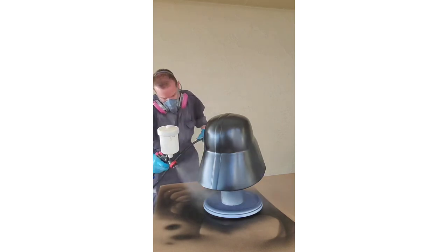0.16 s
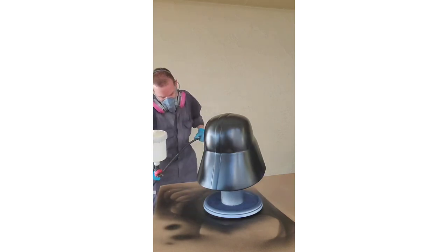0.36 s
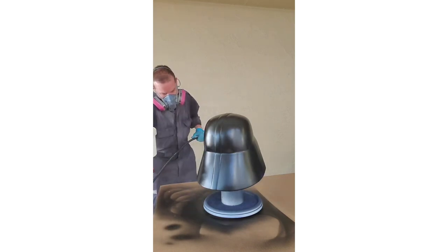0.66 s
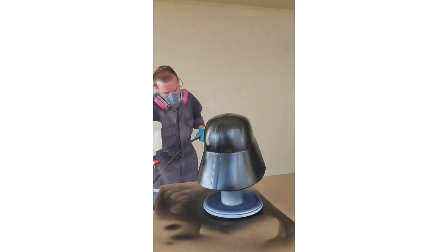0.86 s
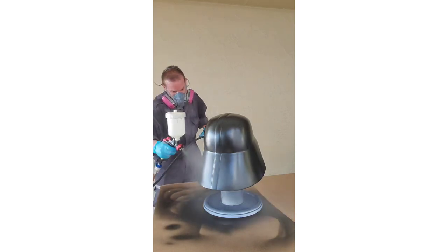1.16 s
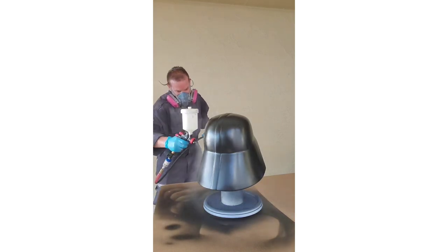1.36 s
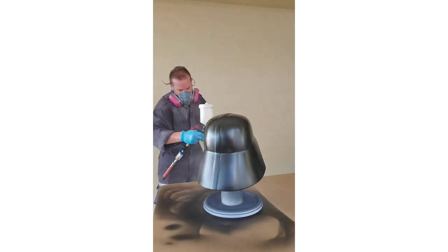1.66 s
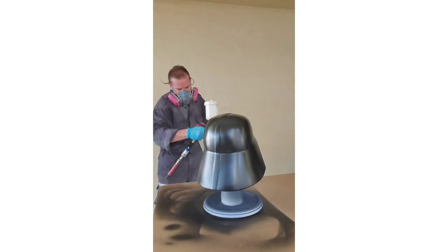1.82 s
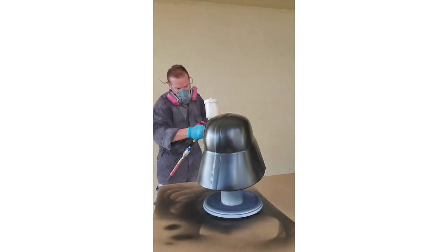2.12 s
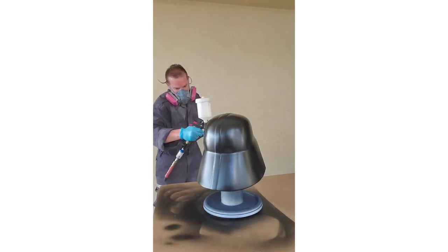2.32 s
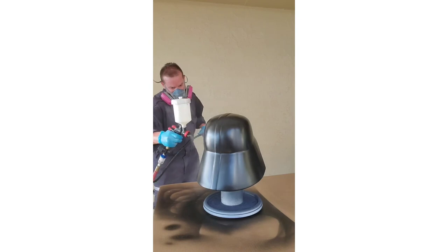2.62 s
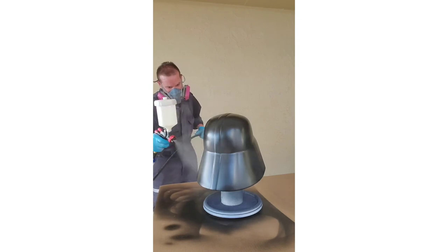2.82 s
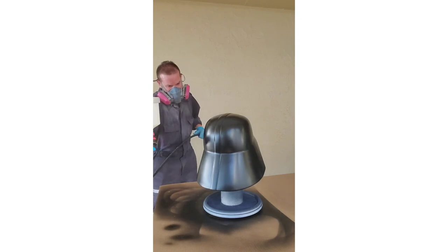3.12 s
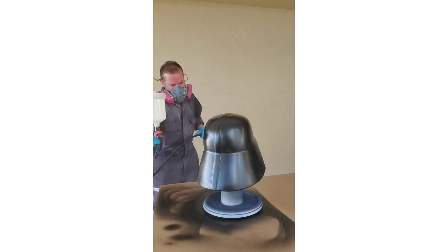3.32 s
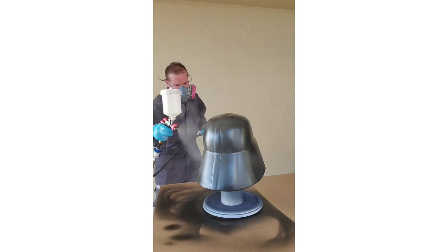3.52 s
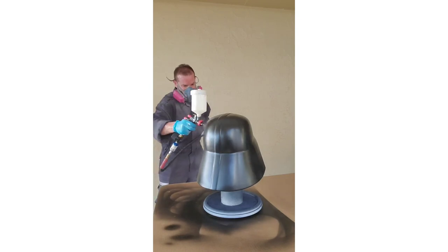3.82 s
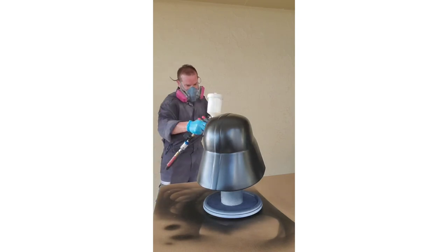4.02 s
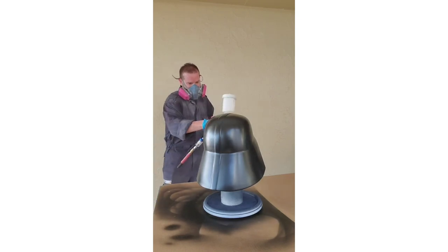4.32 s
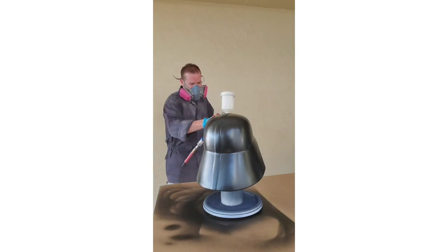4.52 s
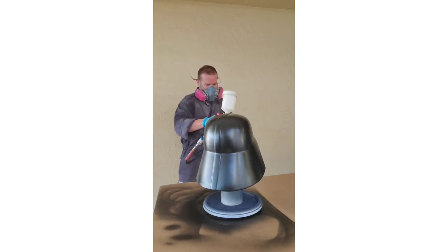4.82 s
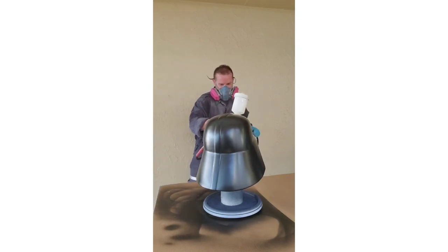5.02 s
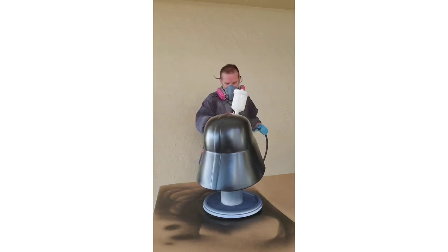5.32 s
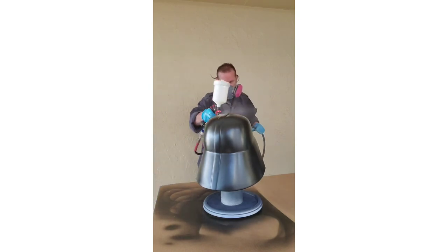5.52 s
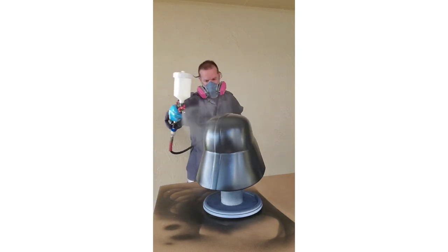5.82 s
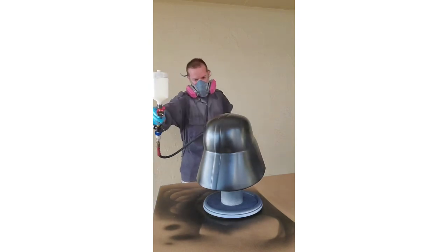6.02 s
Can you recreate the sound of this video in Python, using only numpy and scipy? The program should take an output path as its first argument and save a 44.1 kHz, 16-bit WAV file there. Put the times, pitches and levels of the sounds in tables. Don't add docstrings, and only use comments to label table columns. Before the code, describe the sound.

In a bare workshop, compressed air hisses from a paint gun sweeping nearer and farther, its tone flickering and shifting between left and right. It stops and restarts four times, with dull clicks at release and faint brushing of hose and clothing before the last burst. Steady fan air with a faint wavering tone and fluttery low wind thumps on the phone microphone fill the gaps.

```python
import sys
import numpy as np
from scipy import signal
from scipy.fft import rfft, irfft
from scipy.io import wavfile
from scipy.ndimage import uniform_filter1d

SR = 44100
rng = np.random.default_rng(int(sys.argv[2]) if len(sys.argv) > 2 else 0)


def persist_wave(psi):
    counts = np.round(np.clip(psi, -1, 1) * 32767).astype(np.int16)
    wavfile.write(sys.argv[1], SR, np.atleast_2d(counts).T)


def magnitude_from_level(level_db):
    exponent = np.asarray(level_db, float) / 20
    return 10 ** exponent


N = 271656
T = np.arange(N) / SR
HZ = np.maximum(np.arange(N // 2 + 1) * SR / N, 1)
TOP_HZ = 15715
SIDES = np.array([[.5], [-.5]])


def along(table, hz=HZ):
    table_hz, value = np.transpose(table)
    return np.interp(np.log(hz), np.log(table_hz), value)


def unit(x):
    return x / np.sqrt(np.mean(x ** 2, axis=-1, keepdims=True))


def edge(hz, steep=8):
    return 1 / (1 + (HZ / hz) ** (2 * steep))


def peak(hz, width_hz, x):
    return signal.lfilter(*signal.iirpeak(hz, hz / width_hz, SR), x)


def hiss(colour, alike, lag_s=0.):
    real, imag = rng.standard_normal((2, 3, len(HZ)))
    common, left, right = real + 1j * imag
    share = np.clip(along(alike), 0, 1)
    common = np.array([common * np.exp(-2j * np.pi * HZ * lag_s), common])
    pair = np.sqrt(share) * common + np.sqrt(1 - share) * np.array([left, right])
    return unit(irfft(pair * colour * (HZ < 1.02 * TOP_HZ), N))


def spread(db, pan_db):
    gains = magnitude_from_level(SIDES * pan_db)
    return 2 * magnitude_from_level(db) * gains / np.sqrt(np.sum(gains ** 2, axis=0))


def walk(rate):
    hold = int(SR / rate)
    steps = np.repeat(rng.standard_normal(N // hold + 1), hold)
    return unit(uniform_filter1d(uniform_filter1d(steps, hold), hold)[:N])


def bump(centre_s, length_s):
    return np.exp(-.5 * ((T - centre_s) / (length_s / 2)) ** 2)


def after(start_s, fade_s):
    return (T > start_s - .1) * np.exp(-np.maximum(T - start_s, 0) / fade_s)


# pitch_hz, level_db (per Hz)
JET_LEFT = [(900, -32.9), (1400, -25.1), (2200, -26.4), (3200, -18.3), (4300, -14.6), (6000, -12.6),
            (7800, -9.3), (8500, -17.8), (9400, -22.9), (11000, -20.0), (13000, -12.5), (14500, -5.1),
            (15500, 0.0), (15800, -2.9)]
JET_RIGHT = [(900, -20.2), (1400, -13.4), (2200, -15.0), (3200, -9.6), (4300, -5.3), (6000, -3.2),
             (7600, -2.5), (8300, -7.4), (9000, -5.5), (10000, -5.7), (11500, -3.2), (12700, 0.0),
             (13800, -2.9), (15700, -4.2)]
# pitch_hz, share (0 to 1)
JET_ALIKE = [(1400, .55), (5000, .45), (9000, .2), (12000, .2), (15000, .4)]


def jet():
    hiss_db, lip_db, splash_db, hiss_pan, lip_pan = aim()
    colour = magnitude_from_level([along(JET_LEFT), along(JET_RIGHT)]) * (1 - edge(1000, steep=3))
    colour[0] *= 1 - .25 / (1 + ((HZ - 7000) / 500) ** 2)
    low, high = edge(2800, steep=3), 1 - edge(8600)
    shares = ((1 - low) * (1 - high), high, low)
    lag_s = -.00006
    mixing, lip, splash = (hiss(colour * np.sqrt(share), JET_ALIKE, lag_s) for share in shares)

    eddies = .7 * walk(120) + .45 * walk(20)
    mixing = mixing * spread(hiss_db + 2.2 + eddies, hiss_pan)
    lip = lip * spread(lip_db - .4 + 1.3 * eddies + 1.5 * walk(400), lip_pan)
    splash = splash * spread(splash_db + 1 + 1.6 * walk(10), .6 * hiss_pan)

    flow = valve()
    plume = signal.lfilter([.012], [1, -.988], flow ** .8, zi=flow[:1])[0]
    cloud = bounce(mixing + splash, echo_db=-11, lag_s=.0022, swing_s=.0005, rate=4.5)
    cloud = bounce(cloud, echo_db=-12, lag_s=.0004, swing_s=.00012, rate=3.2)
    return magnitude_from_level(-.9) * (cloud * plume + (lip + whistles()) * flow)


# leak_start_s, leak_db (under full flow), full_flow_s, rise_s, shut_s
TRIGGER = [
    (-.3, -20, -.2, .015, .21),
    (.684, -27, .687, .012, 1.635),
    (2.029, -26, 2.032, .013, 2.878),
    (3.243, -27, 3.256, .008, 4.068),
    (5.145, -29, 5.149, .013, 5.9),
]


def valve():
    flow = np.zeros(N)
    for opens, leak_db, full, rise, shut in TRIGGER:
        times = [opens - .03, opens - .008, opens, full, full + rise, shut, shut + .012, shut + .03]
        levels_db = [-99, leak_db - 18, leak_db, leak_db + 4, 0, 0, -12, -99]
        flow += magnitude_from_level(np.interp(T, np.sort(times), levels_db))
    return flow


# time_s, hiss_db, facing_db (nozzle towards the phone)
SWEEP = [(0.0, -35.5, 0), (.19, -35, .5), (.72, -39, 1), (.92, -38.5, 0), (1.2, -36, -1), (1.47, -37.5, 0),
         (1.62, -37, -1.5), (2.05, -39, 0), (2.28, -39.5, -1), (2.6, -34, -.5), (2.84, -33.5, -1),
         (2.89, -34, -3), (3.4, -39.5, 1), (3.75, -39, 1), (4.06, -40, 1), (5.4, -39.5, 1), (5.75, -36, .5),
         (5.88, -34.5, -.5)]
# start_s, surge_db, plume_share (0 to 1), swing_right_db
SURGES = [
    (.706, 12, .22, 9),
    (2.058, 9, .42, 0),
    (3.278, 13, .33, 10),
    (5.178, 10, .6, 1),
]


def aim():
    s, level_db, facing_db = np.transpose(SWEEP)
    middle_db = -37
    near = np.interp(T, s, level_db) - middle_db
    surge = sum(db * after(s, fade_s=.06) for s, db, _, _ in SURGES)
    plume = sum(db * share * after(s, fade_s=.1) for s, db, share, _ in SURGES)
    swing = sum(db * after(s, fade_s=.03) for s, _, _, db in SURGES)
    swing = swing + 3 * sum(bump(row[-1], .08) for row in TRIGGER)
    hiss_db = middle_db + near + plume
    lip_db = middle_db + 8 + 1.55 * near + np.interp(T, s, facing_db) + surge
    splash_db = middle_db - 13.5 + 1.05 * near + .2 * plume
    hiss_pan_db = 3 - .8 * swing + .7 * walk(12)
    lip_pan_db = 6.5 - swing + .9 * walk(12)
    return hiss_db, lip_db, splash_db, hiss_pan_db, lip_pan_db


# centre_s, level_db, pitch_hz, width_hz, length_s, left_minus_right_db
WHISTLES = [
    (.71, -23, 11700, 500, .03, -14),
    (.705, -23, 13700, 700, .016, -14),
    (3.273, -26, 10600, 800, .025, -12),
    (2.45, -51, 1350, 200, .35, 0),
    (1.05, -57, 1600, 200, .3, 0),
    (5.86, -33.5, 7600, 500, .07, 3),
    (5.76, -52, 1950, 350, .2, 2),
    (.76, -55, 2100, 400, .14, 0),
    (5.25, -40, 5700, 1200, .16, 2),
    (5.4, -53, 2300, 900, .3, 2),
]


def whistles():
    out = np.zeros((2, N))
    for s, db, hz, width, length, pan in WHISTLES:
        near = np.abs(T - s) < 2 * length
        band = peak(hz, width, rng.standard_normal((2, N // 4))[:, :near.sum()])
        out[:, near] += unit(band) * bump(s, length)[near] * spread(db, pan)
    return out


def bounce(x, echo_db, lag_s, swing_s, rate):
    lags = [np.maximum(lag_s + swing_s * walk(rate), 0) for _ in x]
    echo = np.array([np.interp(T - lag, T, side) for lag, side in zip(lags, x)])
    return (x + magnitude_from_level(echo_db) * echo) / np.sqrt(1 + .8 * magnitude_from_level(2 * echo_db))


# start_s, peak_db, pitch_hz
CLACKS = [
    (.215, -39, 570),
    (1.628, -42, 530),
    (2.879, -38, 565),
    (3.69, -47, 175),
    (4.069, -45, 620),
    (5.906, -46, 430),
]


def trigger():
    out, t = np.zeros(N), T[:4000]
    for s, db, hz in CLACKS:
        ring = np.sin(2 * np.pi * hz * t) * magnitude_from_level(-60 * t / .035)
        ring = ring + .6 * np.sin(2 * np.pi * .38 * hz * t) * magnitude_from_level(-60 * t / .04)
        tick = uniform_filter1d(rng.standard_normal(len(t)), size=20) * magnitude_from_level(6 - 60 * t / .06)
        out[int(s * SR):][:len(t)] += magnitude_from_level(db + 1.5) * (ring + tick)
    return out


# centre_s, level_db, length_s
SHUFFLES = [
    (4.345, -58, .05),
    (4.83, -58, .045),
    (5.115, -53, .07),
    (4.3, -59, .25),
]


def shuffles():
    rustle = hiss(edge(7000, steep=1) * (1 - edge(1300, steep=2)), FAN_ALIKE)
    return rustle * magnitude_from_level(1.8 * walk(150)) * sum(magnitude_from_level(db) * bump(s, length) for s, db, length in SHUFFLES)


# pitch_hz, fade_s (time to fall 60 dB)
ROOM = [(500, .5), (3000, .42), (6000, .41), (11000, .35), (15000, .33)]


def room(x):
    t, tail = T[:SR * 3 // 4], 0
    hz = np.maximum(np.arange(len(t) // 2 + 1) * SR / len(t), 1)
    for k, (_, fade_s) in enumerate(ROOM):
        share = along([(f, j == k) for j, (f, _) in enumerate(ROOM)], hz)
        band = irfft(rfft(rng.standard_normal((2, len(t)))) * np.sqrt(share), len(t))
        tail = tail + band * magnitude_from_level(-60 * t / fade_s) / np.sqrt(fade_s) * np.minimum(t / .012, 1)
    tail = tail / np.sqrt(np.sum(tail ** 2, axis=1, keepdims=True))
    return signal.fftconvolve(x, tail, axes=1)[:, :N]


# pitch_hz, level_db (per Hz)
FAN_LEFT = [(400, -0.2), (600, 0.0), (900, -3.4), (1300, -4.6), (2000, -7.7), (3200, -6.9), (5000, -9.2),
            (7700, -11.0), (8400, -14.4), (9200, -20.7), (11000, -19.8), (13500, -17.9), (15500, -15.8)]
FAN_RIGHT = [(400, -1.2), (600, 0.0), (900, -2.8), (1300, -2.9), (2000, -8.2), (3200, -9.8), (5000, -11.7),
             (7700, -12.4), (8400, -15.9), (9200, -16.4), (11000, -16.6), (13500, -19.8), (15500, -21.8)]
# pitch_hz, share (0 to 1)
FAN_ALIKE = [(60, .8), (290, .9), (640, .75), (1400, .3), (3100, .1), (7000, .03)]


def fan():
    colour = magnitude_from_level([along(FAN_LEFT), along(FAN_RIGHT)]) * (1 - edge(90, steep=2))
    bass = .1 * edge(950, steep=3) + .7 * edge(210, steep=3)
    duct = .45 / (1 + ((HZ - 790) / 80) ** 2)
    treble = .25 * (1 - edge(6000, steep=2))
    air = hiss(colour * (1 + bass + duct + treble), FAN_ALIKE)
    blade_hz = 716.0 + 3.5 * walk(28)
    blade = np.sin(2 * np.pi * np.cumsum(blade_hz) / SR) * magnitude_from_level(-66 + 2.2 + 3.6 * walk(14))
    return air * magnitude_from_level(-53.3 + .6 * walk(2.5)) + blade


# pitch_hz, level_db (per Hz)
BUFFET = [(15, -19.3), (25, -12.4), (40, -5.3), (65, 0.0), (85, -2.3), (110, -9.8), (150, -19.1),
          (200, -24.8), (300, -30.9)]


def draught():
    swing_gain, flutter_gain = wind()
    colour = magnitude_from_level(along(BUFFET))
    swing = hiss(colour * (1 - edge(14, steep=2)) * edge(130, steep=3), [(30, .3), (130, .3)])
    swing = unit(swing / uniform_filter1d(swing ** 2, 3500, mode="wrap") ** .24)
    flutter = hiss(colour * (1 - edge(125, steep=3)) * edge(330, steep=3), [(130, .2), (300, .2)])
    onset = np.sqrt(np.clip(1 - 4 * magnitude_from_level(2 * -64) / np.sum(flutter_gain ** 2, axis=0), .02, 1))
    lumps = magnitude_from_level(2.2 * np.array([walk(16), walk(16)]) - .6)
    return swing * lumps * swing_gain + flutter * onset * flutter_gain * magnitude_from_level(1.2 + 2.5 * walk(30))


# centre_s, peak_db, left_minus_right_db, flutter_db (above the peak)
GUSTS = [(.1, -29, -15, -21), (.3, -42, -10, -17), (.48, -37, -8, -20), (.6, -29, -8, -23),
         (.72, -40, -12, -17), (.84, -40, 7, -20), (1.05, -35, -12, -22), (1.19, -35, -10, -18),
         (1.27, -41, -4, -18), (1.41, -41, -3, -22), (1.51, -32, -4, -19), (1.66, -37, 12, -20),
         (1.87, -39, -15, -19), (1.98, -41, -8, -17), (2.26, -38, -12, -20), (2.35, -36, 4, -24),
         (2.44, -31, -11, -14), (2.61, -36, -10, -20), (2.74, -35, -6, -20), (3.11, -37, 0, -18),
         (4.34, -38, -6, -22), (4.43, -38, -2, -19), (4.63, -37, 13, -10), (4.69, -33, 7, -16),
         (4.8, -33, 6, -13), (5.02, -32, 10, -21), (5.21, -37, 1, -21), (5.3, -31, 3, -20),
         (5.72, -42, 6, -23), (6.04, -33, 22, -27)]
# time_s, level_db, left_minus_right_db
BREEZE = [
    (0.0, -44, -6),
    (.92, -52, 0),
    (2.0, -46, -4),
    (3.0, -45, -3),
    (3.45, -53, -1),
    (3.7, -49, 0),
    (4.15, -48, 3),
    (5.1, -45, 6),
    (5.55, -44, 3),
    (6.16, -50, 5),
]


def wind():
    s, *columns = np.transpose(BREEZE)
    db, pan = (np.interp(T, s, c) for c in columns)
    swing, flutter = spread(db, pan) ** 2, spread(db - 13, pan) ** 2
    for s, db, pan, flutter_db in GUSTS:
        swell = bump(s, .062) ** 2
        swing = swing + swell * spread(db, pan) ** 2
        flutter = flutter + swell * spread(db + flutter_db, .8 * pan) ** 2
    return np.sqrt(swing), np.sqrt(flutter)


# start_s, drop_db
DUCKS = [
    (.7, -5),
    (2.05, -1.5),
    (3.265, -5.5),
    (5.165, -1.5),
]


def ducking():
    hold_s, back_s = .15, .25
    drops = [db * (T > s) * np.exp(-np.maximum(T - s - hold_s, 0) / back_s) for s, db in DUCKS]
    return magnitude_from_level(sum(drops))


def scene():
    gun = jet() + trigger() + shuffles()
    walls = magnitude_from_level(-7) * room(gun)
    return gun + walls + fan() * uniform_filter1d(ducking(), 400) + draught()


def band_limit(x):
    return signal.sosfilt(signal.butter(12, 17130, fs=SR, output="sos"), x)


# pitch_hz, width_hz, added_db
PORT = [
    (7800, 300, -7),
    (15600, 400, -6),
]


def record(dry):
    left = dry[0] + sum(magnitude_from_level(db) * peak(hz, width, dry[0]) for hz, width, db in PORT)
    cut = signal.sosfilt(signal.ellip(14, .3, 95, TOP_HZ, fs=SR, output="sos"), [left, dry[1]])
    return band_limit(cut)


dry = scene()
out = record(dry)
persist_wave(out)
```